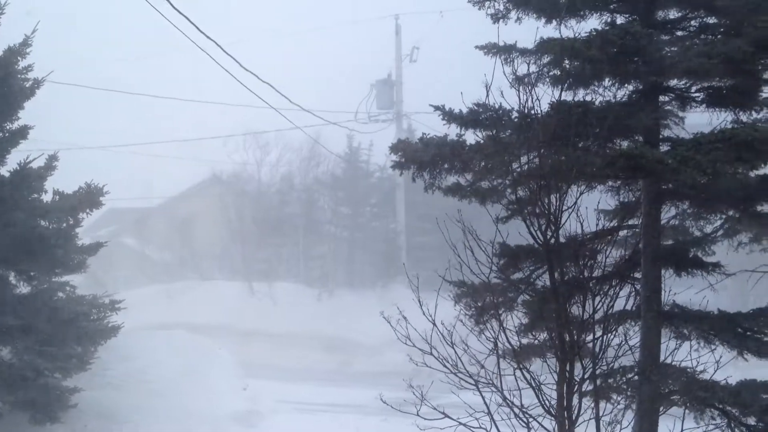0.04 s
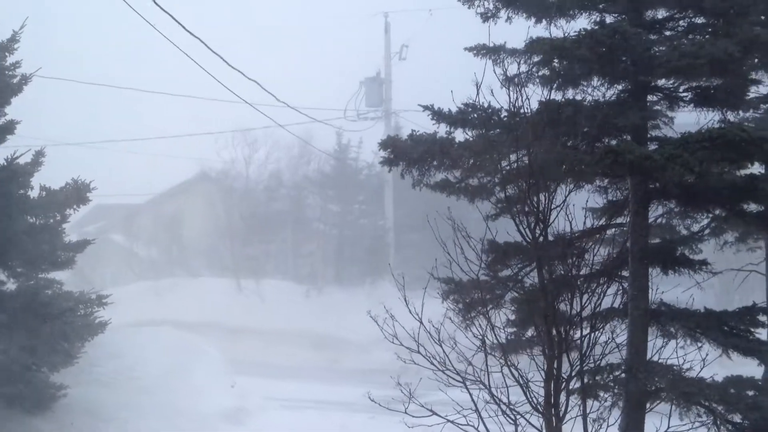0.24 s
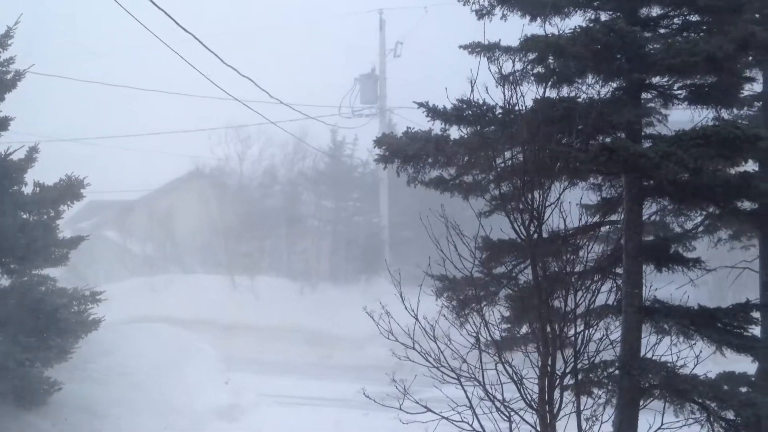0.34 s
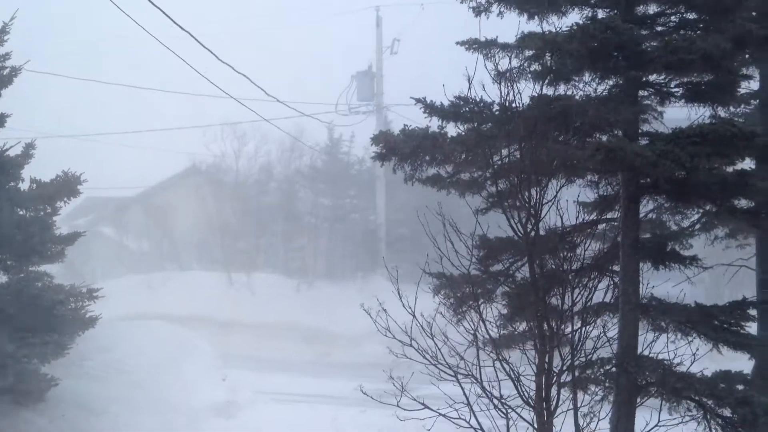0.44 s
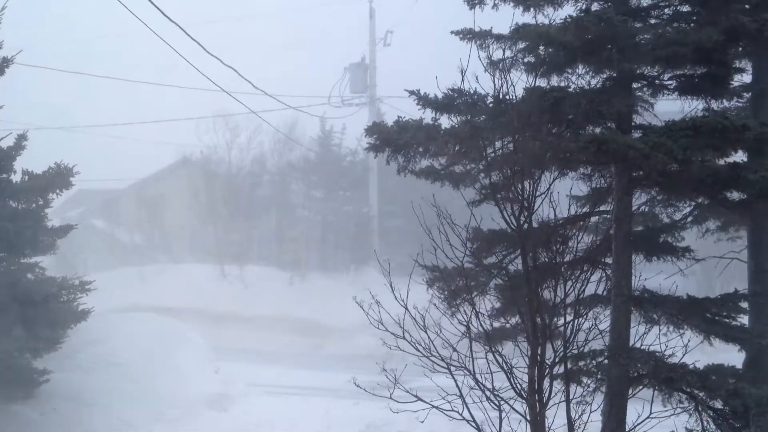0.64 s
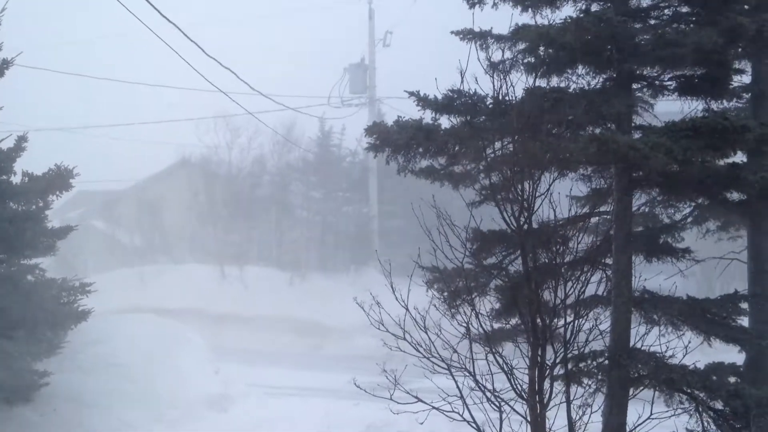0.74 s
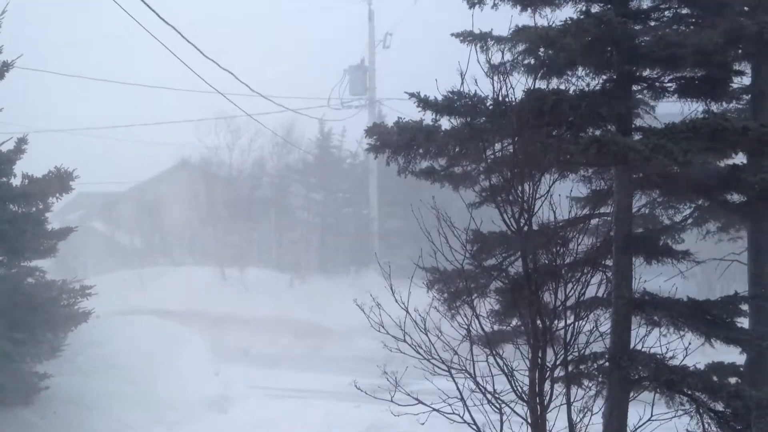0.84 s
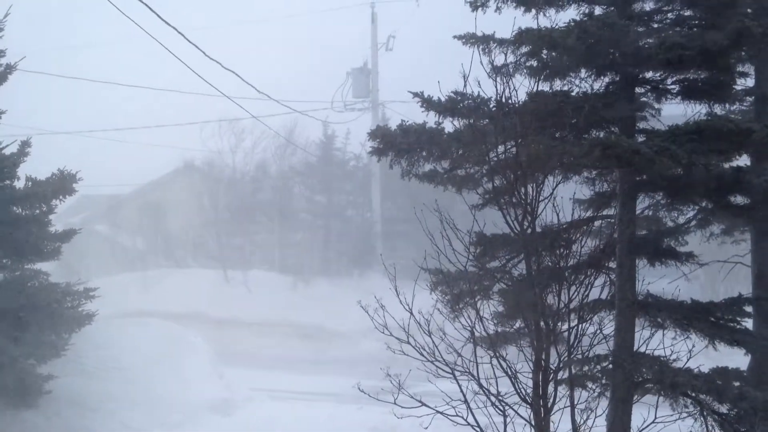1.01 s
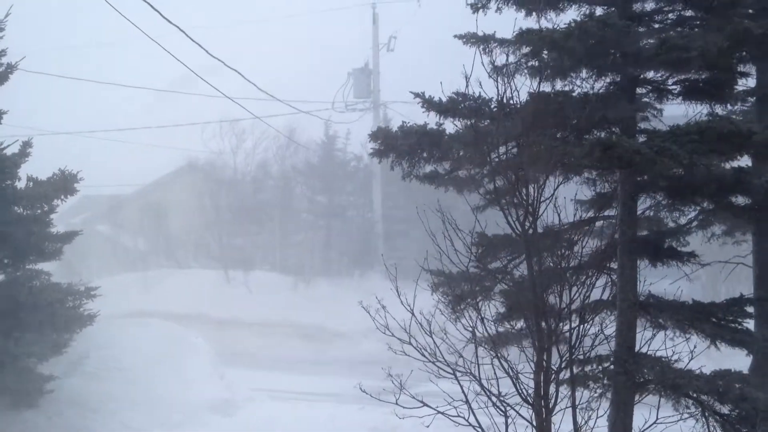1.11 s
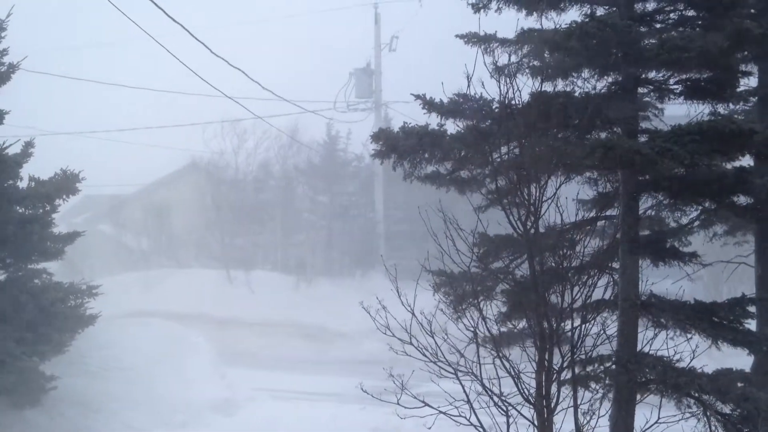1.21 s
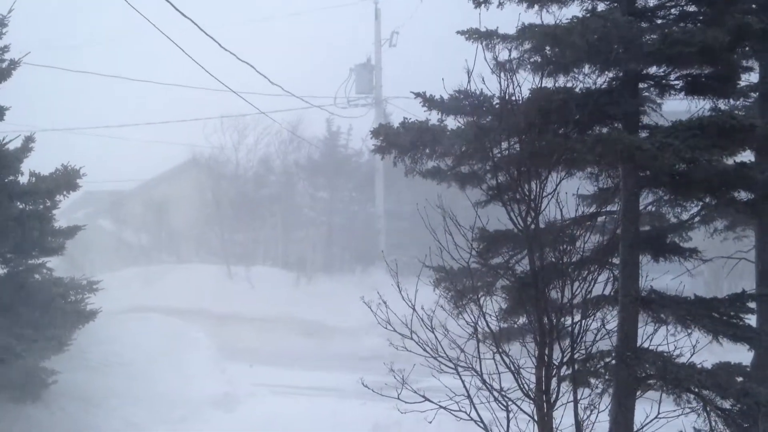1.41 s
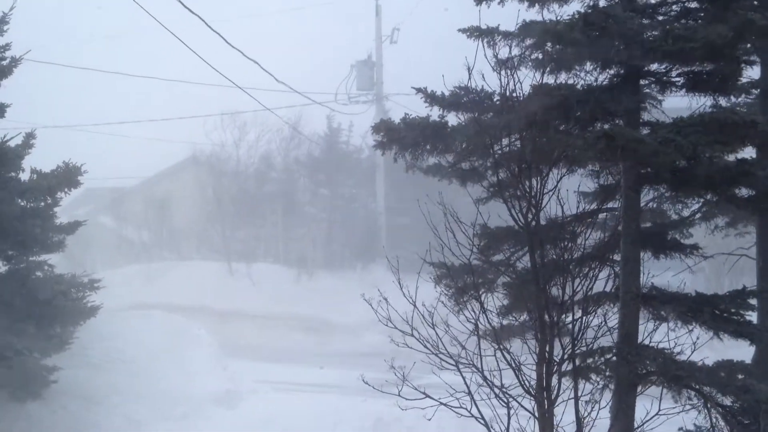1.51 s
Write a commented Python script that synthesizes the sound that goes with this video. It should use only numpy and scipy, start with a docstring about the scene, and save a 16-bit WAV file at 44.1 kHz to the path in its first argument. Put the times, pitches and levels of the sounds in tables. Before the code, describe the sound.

Storm wind blows outdoors among snowy trees, a broad, even rush and hiss. Low, rumbling buffets strike the microphone early on and quickly ease, leaving the steady wind with a faint moan behind it.

```python
"""Snowstorm in spruce trees: a steady, broad rush of wind with a fine hiss on top.
In the first second gusts hit the microphone: low flutter, ragged buffets, thumping eddies.
Behind them, faint moans of wind around twigs and wires, and a thin fizz.
The microphone rounds off the strongest peaks and cuts the deep bass."""
import sys
import numpy as np
from scipy import signal
from scipy.fft import rfft, irfft
from scipy.io import wavfile
from scipy.ndimage import uniform_filter1d

SR = 44100
rng = np.random.default_rng(int(sys.argv[2]) if len(sys.argv) > 2 else 0)


def materialize(psi):
    """Save the field psi as 16-bit PCM at rate SR to the path in sys.argv[1].

    A 1-D psi becomes a single channel; in a 2-D psi each row is a channel.
    """
    bounded = np.clip(np.atleast_2d(psi).T, -1, 1)
    quanta = np.round(bounded * 32767).astype(np.int16)
    wavfile.write(sys.argv[1], SR, quanta)


N = 68355
TIME_S = np.arange(N) / SR

# wind in the trees (frequency [Hz], relative density [dB])
RUSH_SPECTRUM = [(30, -43.5), (60, -11), (100, -7), (170, 0.5), (320, -2), (450, -1.5), (800, -3.5),
                 (1500, -4.5), (2300, -10), (4700, -17), (7600, -24.5), (9600, -35), (15500, -39.5)]
# loudness below and above SPLIT_HZ (time [s], roar gain [dB], hiss gain [dB])
# the hiss ducks about 3 dB at the strongest gust
RUSH_LEVEL = [(0, 0, 2), (.22, 3.5, 3), (.43, -3, 5), (.565, -0.5, 3.5), (.59, 2.5, -0.2),
              (.86, -4.5, -0.9), (.98, -3.5, 0.8), (1.2, 0.5, 0), (1.38, .5, 0.4), (1.55, 1, 0.3)]
# air over the microphone (time [s], level [dB])
FLUTTER_LEVEL = [(0, -39.5), (.04, -44.5), (.09, -43.5), (.125, -41.5), (.17, -38.5), (.21, -30.5),
                 (.29, -30), (.35, -32.5), (.385, -45), (.43, -32.5), (.49, -38), (.53, -23), (.6, -28.5),
                 (.68, -41.5), (.70, -51), (.765, -34), (.82, -56.5), (.89, -53), (.97, -51.5),
                 (1.2, -55.5), (1.55, -84)]
# turbulent bursts (start [s], length [s], level [dB], corner [Hz])
BUFFET_EVENTS = [(.243, 0.03, -22, 430), (0.297, 0.0205, -20.5, 380), (.322, 0.03, -23.5, 332),
                 (0.539, 0.053, -17.5, 363), (0.597, 0.039, -27, 675), (0.648, .035, -26.5, 450),
                 (.734, 0.028, -27.5, 620), (.873, 0.033, -42, 302), (1.082, 0.036, -45.5, 160)]
# pressure kicks (time [s], peak [dB], corner [Hz])
EDDY_EVENTS = [(.036, -26.5, 340), (0.113, -26, 405), (0.141, -17.5, 380), (0.2364, -13, 315),
               (.246, -15.5, 820), (0.2613, -22, 765), (0.3048, -7.5, 880), (0.3313, -11, 190),
               (0.3437, -12, 790), (0.5303, -1, 300), (.5458, -8.5, 720), (0.549, -17.5, 420),
               (0.556, -3.5, 330), (.5595, -4.5, 780), (0.5683, -1, 720), (.5748, -5, 1350),
               (0.6135, -15, 800), (.618, -4.5, 230), (0.6224, -10, 297), (0.6505, -20.5, 463),
               (0.6668, -20, 565), (0.718, -16, 450), (.736, -26.5, 705), (0.7462, -15.5, 890),
               (0.776, -29.5, 450), (.856, -31.5, 298)]
# microphone response to air pressure (frequency [Hz], gain [dB])
MIC_RESPONSE = [(15, -43.5), (40, -32), (70, -20), (110, -8), (160, 2), (220, 2), (330, -3), (600, -5),
                (1500, -9), (5000, -20)]
# wind around twigs and wires (centre [Hz], half-width [Hz], final level [dB])
MOAN_BANDS = [(324, 40, -54), (550, 140, -56)]
# top-end fizz (time [s], level [dB])
FIZZ_LEVEL = [(0, -83), (.05, -74), (.07, -66), (.1, -76), (.24, -78), (.29, -70), (.42, -71), (.45, -75),
              (.6, -77), (1.55, -92)]

SPLIT_HZ, BASS_CUT_HZ, BAND_LIMIT_HZ = 1250, 73, 15500
TURBULENCE_DB_PER_OCT, EDDY_DB_PER_OCT = 17.5, 24  # fall above the corner


def rush(base_db=-47, patch_db=1, patch_s=0.16, patch_hz=400):
    """Wind in the trees: drifting patches of noise. Roar and hiss loudness follow RUSH_LEVEL."""
    hz = np.fft.rfftfreq(1024, 1 / SR)
    real, imag, patches = rng.standard_normal((3, N // 256 + 5, len(hz)))
    patches = uniform_filter1d(patches, round(patch_s * len(patches) * SR / N), axis=0)
    patches = unit_rms(uniform_filter1d(patches, round(patch_hz / hz[1]), axis=1))
    frames = (real + 1j * imag) * gain_of(spectrum_db(RUSH_SPECTRUM, hz) + patch_db * patches)
    low_share = 1 / (1 + (hz / SPLIT_HZ) ** 2)
    bands = np.array([(frames * low_share).T, (frames * (1 - low_share)).T])
    roar, hiss = signal.istft(bands, nperseg=1024, noverlap=768)[1][:, :N]
    roar = bass_cut(roar, order=4)
    shaped = roar * envelope(RUSH_LEVEL) + hiss * envelope(RUSH_LEVEL, column=2)
    return gain_of(base_db) * shaped / np.std(roar + hiss)


def flutter(corner_hz=384, rms_window_s=0.035):
    """Unbroken low turbulence at the microphone."""
    rumble = noise(lambda hz: pressure_gain(hz, corner_hz, TURBULENCE_DB_PER_OCT))
    running_rms = np.sqrt(uniform_filter1d(rumble ** 2, round(rms_window_s * SR)) + 1e-6)
    return envelope(FLUTTER_LEVEL) * rumble / running_rms


def buffet(length_s, level_db, corner_hz, rise_s=0.0056, fall_s=0.016):
    """Short burst of stronger turbulence."""
    t = np.arange(0, length_s, 1 / SR)
    ramp = np.clip(np.minimum(t / rise_s, (length_s - t) / fall_s), 0, 1)
    rumble = noise(lambda hz: pressure_gain(hz, corner_hz, TURBULENCE_DB_PER_OCT))
    return gain_of(level_db) * unit_rms(ramp * rumble[:len(t)])


def eddy(time_s, peak_db, corner_hz, abruptness=0.89, size=4096):
    """One pressure kick, ringing briefly from the microphone's bass cut. Returns (start [s], sound)."""
    hz = abs(np.fft.fftfreq(size, 1 / SR))
    log_gain = np.log(pressure_gain(hz, corner_hz, EDDY_DB_PER_OCT) + 1e-5)
    lag_rad = abruptness * signal.hilbert(log_gain).imag  # abruptness 0: symmetric, 1: instant onset
    lead = size // 4
    kick = np.roll(np.fft.ifft(np.exp(log_gain - 1j * lag_rad)).real, lead)
    return time_s - lead / SR, gain_of(peak_db) * kick / abs(kick).max()


def moans(rise_db_per_s=11):
    """Wind around twigs and wires: narrow, fuzzy tones that grow towards the end."""
    tones = sum(gain_of(level_db) * noise(lambda hz: 1 / (1 + ((hz - centre_hz) / half_width_hz) ** 2))
                for centre_hz, half_width_hz, level_db in MOAN_BANDS)
    return tones * gain_of(rise_db_per_s * (TIME_S - TIME_S[-1]))


def fizz(corner_hz=9500):
    """Thin treble noise, as of fine blown snow."""
    treble = noise(lambda hz: (hz < BAND_LIMIT_HZ) * np.minimum(hz / corner_hz, 1) ** 2)
    return envelope(FIZZ_LEVEL) * treble


def pressure_gain(hz, corner_hz, fall_db_per_oct):
    """Spectrum of turbulent pressure at the microphone; steep fall above the corner."""
    exponent = fall_db_per_oct / (10 * np.log10(2))
    return gain_of(spectrum_db(MIC_RESPONSE, hz)) / np.sqrt(1.5 + (hz / corner_hz) ** exponent)


def gain_of(db):
    """Decibels to gain."""
    return 10 ** (np.asarray(db) / 20)


def unit_rms(x):
    """Scale to rms 1."""
    return x / np.sqrt(np.mean(x ** 2) + 1e-20)


def spectrum_db(table, hz):
    """Interpolate a spectrum over log frequency."""
    knots_hz, knots_db = np.transpose(table)
    return np.interp(np.log(hz + 1), np.log(knots_hz + 1), knots_db)


def envelope(table, column=1):
    """One dB column as gain per sample."""
    columns = np.transpose(table)
    return gain_of(np.interp(TIME_S, columns[0], columns[column]))


def noise(shape):
    """Unit-rms noise with spectral gain shape(hz)."""
    white = rfft(rng.standard_normal(N))
    return unit_rms(irfft(white * shape(np.fft.rfftfreq(N, 1 / SR)), N))


def bass_cut(x, order):
    """High-pass at BASS_CUT_HZ."""
    return signal.sosfilt(signal.butter(order, BASS_CUT_HZ, "high", fs=SR, output="sos"), x)


def add(mix, start_s, sound):
    """Mix a sound in at start_s."""
    part = mix[max(round(start_s * SR), 0):][:len(sound)]
    part += sound[:len(part)]


def scene():
    """Storm in the trees plus gusts on the microphone, mono."""
    gusts = flutter()
    for start_s, *settings in BUFFET_EVENTS:
        add(gusts, start_s, buffet(*settings))
    for event in EDDY_EVENTS:
        add(gusts, *eddy(*event))
    return (rush() + gusts + moans() + fizz())[None]


def record(dry):
    """Microphone: soft overload, bass cut, band limit."""
    ceiling = 0.75
    rounded = dry / (1 + (dry / ceiling) ** 4) ** 0.25
    lowpass = signal.firwin(511, BAND_LIMIT_HZ, window=("kaiser", 9), fs=SR)
    return signal.oaconvolve(bass_cut(rounded, order=2), lowpass[None], "same")


dry = scene()
out = record(dry)
materialize(out)
```